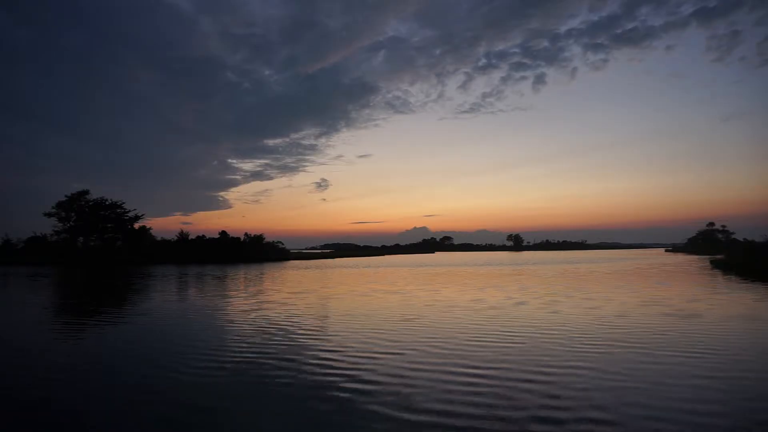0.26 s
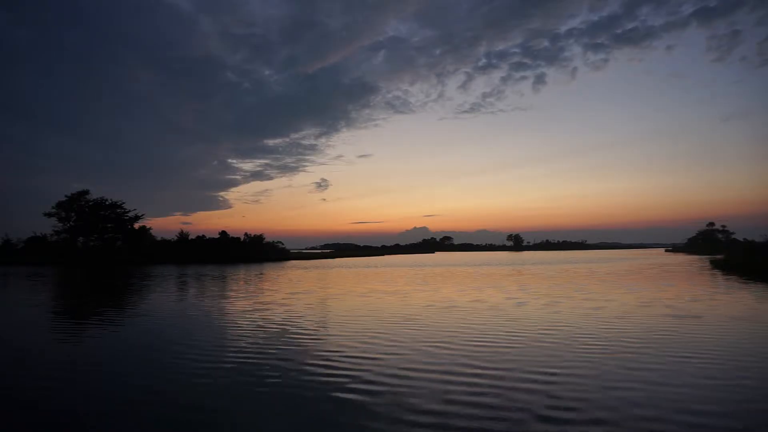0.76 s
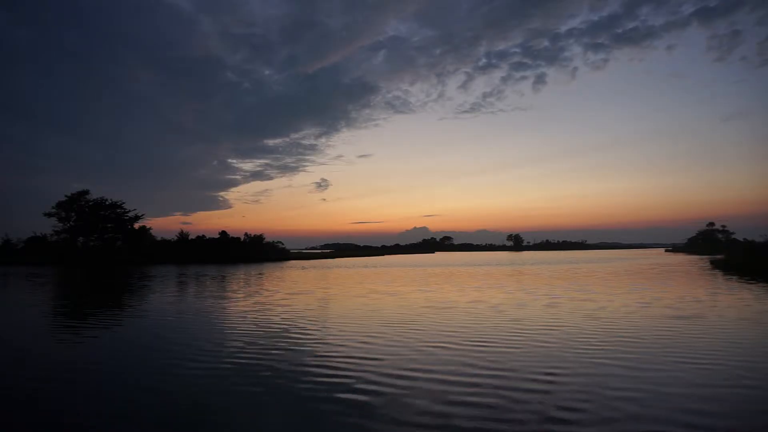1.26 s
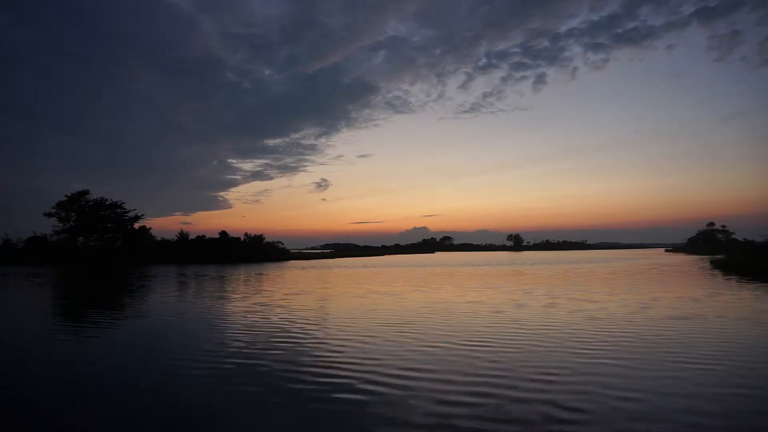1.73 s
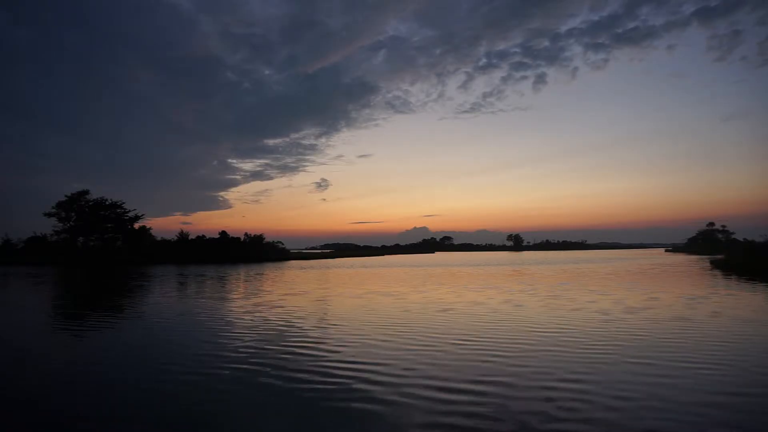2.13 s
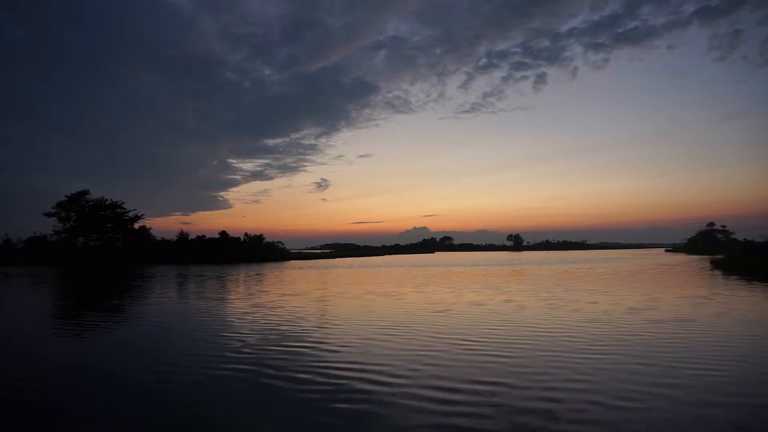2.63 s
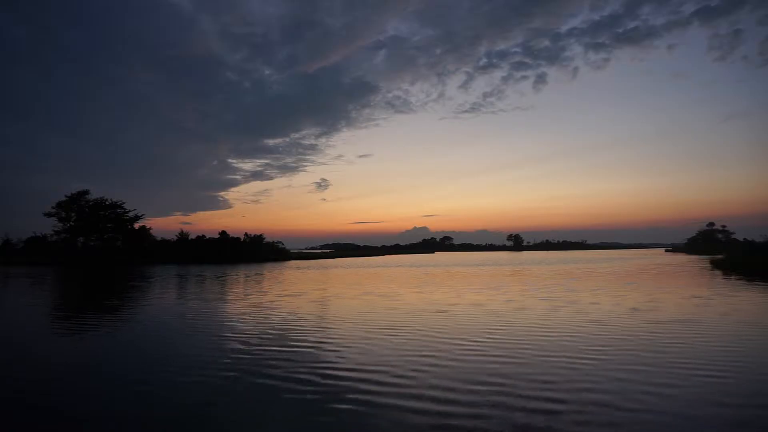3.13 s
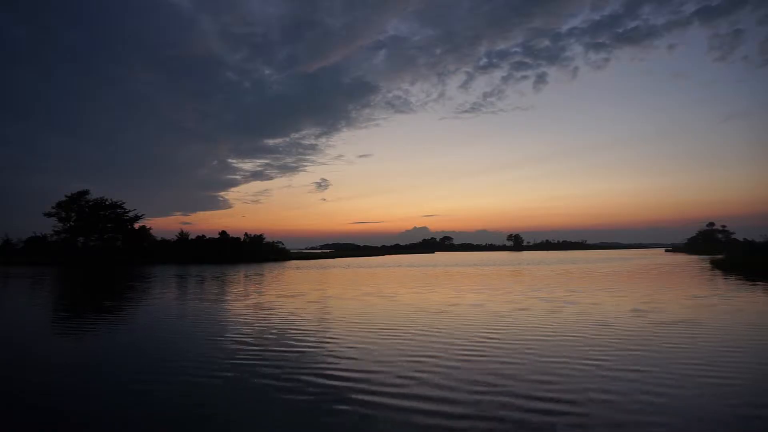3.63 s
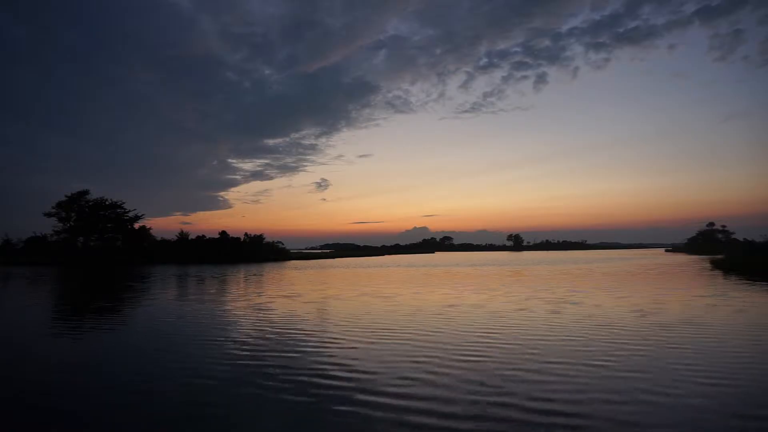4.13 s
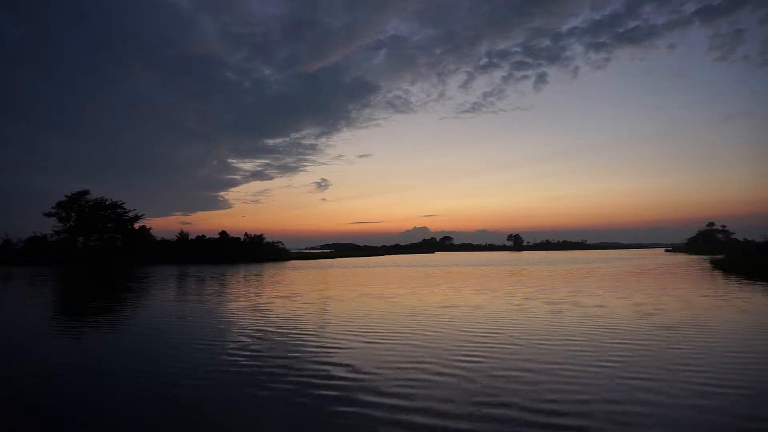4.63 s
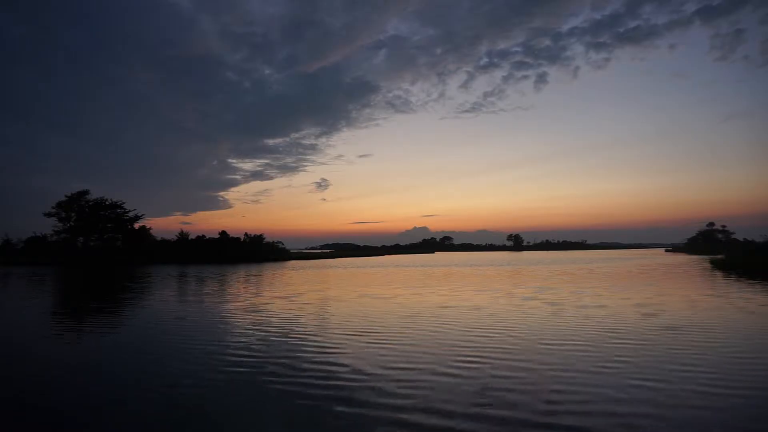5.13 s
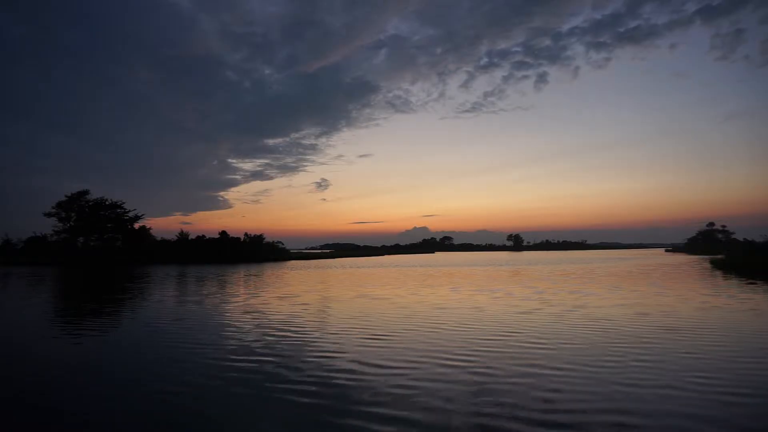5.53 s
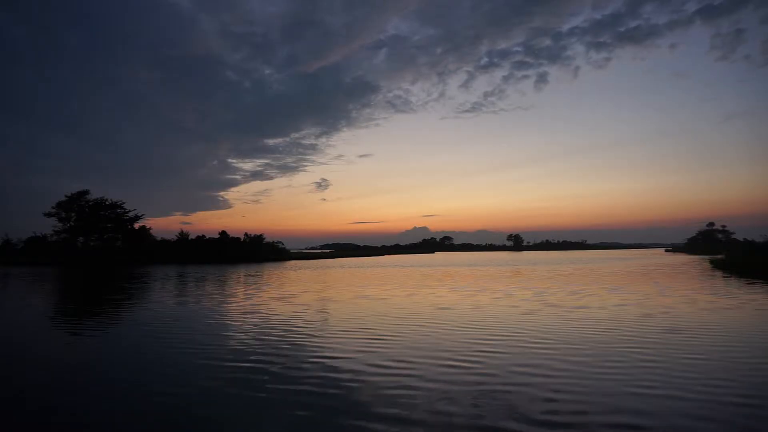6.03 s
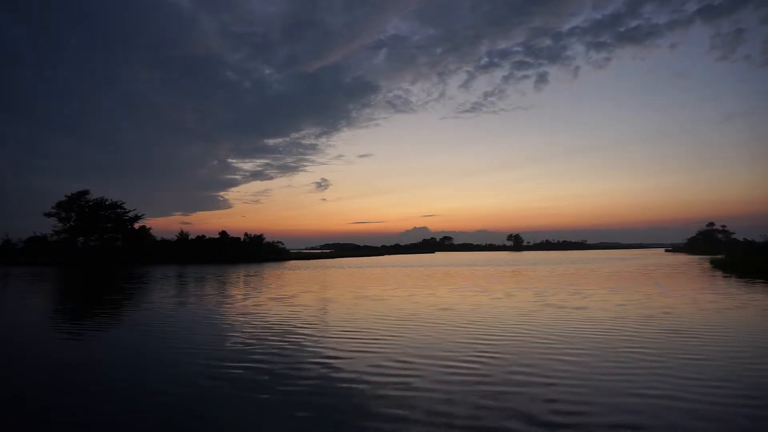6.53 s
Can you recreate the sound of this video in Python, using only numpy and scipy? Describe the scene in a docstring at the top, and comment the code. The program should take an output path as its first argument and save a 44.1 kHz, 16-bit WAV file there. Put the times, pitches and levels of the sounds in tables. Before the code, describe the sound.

Over a soft, steady hiss of air and water with faint high insect trills, small dry ticks close to the microphone gather into a dense rattle, strongest around two seconds, while a far bird gives rising chirps. It then thins to isolated clicks and soft wind bumps. Two sharp snaps stand out at about 3.4 and 6 seconds; grass rustles and water plips near the end. Open marsh shore, short faint echo.

```python
"""Dusk on a marsh shore. From the start: a hiss of air and water (filtered noise), two far insect trills (pulsed
resonances), runs of dry ticks from a handled camera mount (short tone packets and cracks) and falling double peeps.
Then dull knocks (crack and low ring), wind bumps on the microphone (low noise, short rings), a far bird's rising
chirps (gliding sines) and bright clicks (mostly crack). Two sharp snaps (slip, break, rebound) fall in the second half.
Late on, water plips (bubble rings), a near cricket trills briefly, grass rustles (dense grains), squeaks glide."""
import sys
import numpy as np
from scipy import signal
from scipy.fft import rfft, irfft, next_fast_len
from scipy.io import wavfile
from scipy.ndimage import uniform_filter1d

SR = 44100
rng = np.random.default_rng(int(sys.argv[2]) if len(sys.argv) > 2 else 0)


def master_out(mix):
    """Clip the mix to full scale and print it as 16-bit PCM to the path in sys.argv[1]."""
    frames = np.transpose(np.atleast_2d(mix))
    ceiling = np.clip(frames, -1, 1)
    pcm = np.round(ceiling * 32767).astype(np.int16)
    wavfile.write(sys.argv[1], SR, pcm)


N = 298557
TIME = np.arange(N) / SR
LEAD_S = .006  # silence ahead of each crack, room for an early slip


def gain_of(db):
    """Decibels to gain."""
    return 10 ** (np.asarray(db) / 20)


def evened(x):
    """Scales to rms 1."""
    return x / np.sqrt(np.mean(x ** 2) + 1e-20)


def read(points, hz):
    """Interpolates a spectrum on a log-frequency axis."""
    point_hz, value = np.transpose(points)
    return np.interp(np.log(hz + 1), np.log(point_hz + 1), value)


def level(curve):
    """Gain at every sample from rows (s, dB)."""
    return gain_of(np.interp(TIME, *np.transpose(curve)))


def swells(rows, attack_s, release_s):
    """Gain at every sample from rows (start s, length s, dB): each rises, holds and dies away."""
    power = np.zeros(N)
    for start_s, length_s, db in rows:
        before = np.maximum(start_s - TIME, 0) / attack_s
        after = np.maximum(TIME - start_s - length_s, 0) / release_s
        power += (gain_of(db) * np.exp(-np.minimum(before + after, 20))) ** 2
    return np.sqrt(power)


def add(mix, start_s, sound):
    """Mixes a sound in at a time."""
    part = mix[..., max(round(start_s * SR), 0):][..., :sound.shape[-1]]
    part += sound[..., :part.shape[-1]]


def coloured(x, points, tilt_db=0):
    """Filters by a spectrum, tilted in dB per octave about 3 kHz (flat below 700 Hz); rms 1."""
    hz = np.fft.rfftfreq(x.shape[-1], 1 / SR)
    octaves = np.log2(np.maximum(hz, 700) / 3000)
    gain = gain_of(read(points, hz) + tilt_db * octaves)
    return evened(irfft(rfft(x) * gain, x.shape[-1]))


def drift(hz):
    """Slow random curve of rms 1: noise under a Gaussian lowpass."""
    size = next_fast_len(N, True)
    lowpass = np.exp(-(np.fft.rfftfreq(size, 1 / SR) / hz) ** 2)
    return evened(irfft(rfft(rng.standard_normal(size)) * lowpass, size)[:N])


def noise_pair(size, same):
    """White noise at two ports, correlated by a share."""
    a, b = rng.standard_normal((2, size))
    same = np.clip(same, -1, 1)
    return np.array([a, same * a + np.sqrt(1 - same ** 2) * b])


def crack(colour, decay_s, tilt_db=0, direct_s=0.02):
    """A dying noise burst of tiny fractures after a short lead; its later part arrives from all sides."""
    t = np.arange(4096) / SR - LEAD_S
    fade = np.exp(-np.abs(t) / decay_s) * (t >= 0)
    noise = noise_pair(len(t), np.exp(-np.abs(t) / direct_s))
    return coloured(noise * fade, colour, tilt_db) * np.sqrt(np.mean(fade ** 2))


def ring(hz, decay_s):
    """A short resonance that swells for one decay time, then dies."""
    t = np.arange(0, 10 * decay_s, 1 / SR)
    return t / decay_s * np.exp(1 - t / decay_s) * np.sin(2 * np.pi * hz * t)


def glide(length_s, first_hz, last_hz):
    """A thin tone that slides up or down in a straight line."""
    hz = np.linspace(first_hz, last_hz, round(length_s * SR))
    return signal.windows.tukey(len(hz), .7) * np.sin(2 * np.pi * np.cumsum(hz) / SR)


# Slow level of the open air. Each row: time in seconds, level in dB.
AIR_LEVEL_DB = [(0, -64), (1.2, -63.5), (2.3, -62), (3, -64.5), (3.9, -61), (4.8, -63), (6.77, -63.5)]
# Spectrum of the air. Each row: frequency in Hz, relative density in dB.
AIR_SPECTRUM_DB = [(15, -70), (25, -39), (94, -23.5), (311, -4), (381, -6), (433, -2.5), (573, -2),
                   (1000, -0.5), (1330, -2), (2450, -6), (3500, -6), (3970, -6.5), (6960, -10), (8750, -8),
                   (11000, -12), (14300, -113), (22000, -120)]
# Correlation of the air at the two ports. Each row: frequency in Hz, share (clipped to 1).
AIR_CORRELATION = [(130, 1.5), (270, 0.87), (570, 0.1), (1200, 0), (11000, 0.06)]
# Balance of the air. Each row: frequency in Hz, left minus right in dB.
AIR_BALANCE_DB = [(110, -2.5), (350, -3), (620, -6), (1120, 0.5), (2000, 0.5), (3600, 0), (11000, 0)]


def air(patch_db=1.0):
    """Far water and air: a soft hiss with drifting patches, alike at both ports only in the bass."""
    frames, hz = N // 256 + 5, np.fft.rfftfreq(1024, 1 / SR)
    a, b, c, d, patches = rng.standard_normal((frames, 513, 5)).T
    patches = uniform_filter1d(patches, size=12, axis=0)
    patches = evened(uniform_filter1d(patches, size=16, axis=1))
    same = np.clip(read(AIR_CORRELATION, hz), -1, 1)[:, None]
    side = gain_of(read(AIR_BALANCE_DB, hz) / 2)[:, None]
    left = a + 1j * b
    right = same * left + np.sqrt(1 - same ** 2) * (c + 1j * d)
    bins = np.array([left * side, right / side])
    bins *= gain_of(read(AIR_SPECTRUM_DB, hz)[:, None] + patch_db * patches)
    hiss = signal.istft(bins, nperseg=1024, noverlap=768)[1][:, :N]
    return level(AIR_LEVEL_DB) * evened(hiss)


def trill(curve, hz, width_hz, strokes_hz, depth, direct=0):
    """Wing strokes pulse a resonance that distance has smeared; a near insect keeps a direct tone."""
    smear = direct + drift(width_hz) + 1j * drift(width_hz)
    carrier = np.exp(2j * np.pi * hz * TIME) * smear
    strokes = np.cumsum(strokes_hz * (1 + 0.0199 * drift(3.3))) / SR
    pulses = np.exp(depth * np.cos(2 * np.pi * strokes))
    ports = np.array([carrier.real, (carrier * np.exp(-.8j)).real])  # right lags 0.8 rad
    return level(curve) * evened(pulses * ports)


# Level of a high katydid. Each row: time in seconds, level in dB.
KATYDID_LEVEL_DB = [(0, -80.5), (.5, -74.5), (1.5, -73), (2.7, -75), (4, -73), (4.7, -79.5), (6.77, -92)]


def katydid():
    """High trill: wing strokes pulse a smeared resonance."""
    return trill(KATYDID_LEVEL_DB, hz=8660, width_hz=240, strokes_hz=55.4, depth=0.39)


# Level of a far insect chorus. Each row: time in seconds, level in dB.
CHORUS_LEVEL_DB = [(0, -72.5), (.5, -69.5), (1, -74.5), (2.8, -73.5), (3.2, -90), (6.77, -78)]


def chorus():
    """Far insects: a wide resonance, only shallowly pulsed."""
    return trill(CHORUS_LEVEL_DB, hz=4200, width_hz=330, strokes_hz=51.0, depth=0.11)


# Spectrum of a tick's scatter. Each row: frequency in Hz, relative level in dB.
TICK_SPECTRUM_DB = [(20, -60), (150, -41), (600, -15.5), (1250, -1.5), (1700, -9), (2400, 6.5), (3100, 2.5),
                    (4500, 6.5), (5600, -7), (8500, -8.5), (11000, -21)]


def tick(hz, half_s=0.00059, slip_db=-15, rebound_db=-6, rattle_db=-10, scatter_db=-14):
    """A soft slip, a main packet of a few cycles, two uneven rebounds and a scattered tail."""
    out = gain_of(scatter_db) * crack(TICK_SPECTRUM_DB, decay_s=0.0093)
    t = np.arange(len(out[0])) / SR - LEAD_S - .0007  # main packet peaks 0.7 ms after the crack starts
    slip_s, rebound_s = -rng.uniform(0.00117, 0.0069), rng.uniform(0.001286, 0.00254)
    delays_s = [0, slip_s, rebound_s, rng.uniform(0.00297, 0.0035)]
    pitches_hz = hz * np.append(1, rng.uniform(0.87, 1.2, 3))
    for delay_s, pitch_hz, db in zip(delays_s, pitches_hz, [0, slip_db, rebound_db, rattle_db]):
        envelope = 1 / np.cosh(np.clip((t - delay_s) / half_s, -20, 20))
        out += gain_of(db) * np.cos(2 * np.pi * pitch_hz * (t - delay_s)) * envelope
    return out


# The clearest dry ticks. Each row: start in seconds, level in dB.
CLEAR_TICKS = [(0.035, -46), (0.07, -47.5), (0.408, -44), (0.66, -44.5), (0.674, -44), (0.713, -50),
               (0.7552, -41), (0.768, -43.5), (0.8266, -39), (0.86, -40.5), (0.905, -47.5), (0.913, -41),
               (1.1537, -40), (1.1757, -36.5), (1.1938, -30), (1.235, -35), (1.258, -34), (1.3069, -31),
               (1.3321, -29.5), (1.354, -28.5), (1.3821, -38.5), (1.6053, -42.5), (1.694, -38.5),
               (1.7116, -39.5), (1.7502, -37), (1.76, -37.5), (1.7679, -34), (1.7926, -35), (1.8162, -23),
               (1.849, -25.5), (1.87, -23.5), (1.904, -33.5), (1.932, -31.5), (1.9746, -36), (1.990, -25),
               (2.0113, -29), (2.025, -27.5), (2.0378, -25), (2.054, -31.5), (2.0724, -29.5),
               (2.1048, -38.5), (2.1492, -39.5), (2.277, -44), (2.2984, -43.5), (2.4244, -33.5),
               (2.4421, -27.5), (2.474, -43), (2.4932, -33), (2.7824, -42), (2.876, -48.5)]
# Runs of faint slips as the mount creeps. Each row: start in seconds, length in seconds, level in dB.
CREEP_RUNS = [(.02, 0.1, -48), (.24, 0.18, -52.5), (.7, .22, -44.5), (1.11, 0.29, -45.5),
              (1.46, 0.22, -49.5), (1.69, 0.49, -46), (2.22, .11, -45), (2.42, 0.099, -48),
              (2.54, 0.21, -57)]
# Spectrum of a slip's scratch. Each row: frequency in Hz, relative level in dB.
SCRATCH_SPECTRUM_DB = [(20, -85), (1200, -6), (1900, -18), (2500, 3.5), (3100, 3.5), (4300, -3),
                       (5500, -22), (11000, -14.5)]
TICK_HZ, TICK_SCATTER = 3080, .035  # shared pitch; share by which it varies
SLIPS_PER_S = 60


def ticks(spread_db=3, rub_db=-8, small_db=-4, small_spread_db=5):
    """Clear ticks; between them the mount creeps in uneven slips, each a scratch and often a small tick."""
    out = np.zeros((2, N))
    for (s, db), detune in zip(CLEAR_TICKS, 2 * rng.random(len(CLEAR_TICKS)) - 1):
        add(out, s - LEAD_S, gain_of(db) * tick(TICK_HZ * (1 + TICK_SCATTER * detune)))
    creep = swells(CREEP_RUNS, attack_s=0.017, release_s=0.049)
    starts_s = np.arange(0, 3, 1 / SLIPS_PER_S)
    for s, (late, size, tilt, catch, detune) in zip(starts_s, 2 * rng.random((len(starts_s), 5)) - 1):
        s += abs(late) / SLIPS_PER_S
        scratch = crack(SCRATCH_SPECTRUM_DB, decay_s=0.0059, tilt_db=1.3 * tilt)
        slip = gain_of(rub_db + spread_db * size) * scratch
        if catch > 0:
            small = tick(TICK_HZ * (1 + TICK_SCATTER * detune))
            slip += gain_of(small_db + small_spread_db * size) * small
        add(out, s - LEAD_S, creep[round(s * SR)] * slip)
    return out


# Right port's phase lag for near sounds. Each row: frequency in Hz, lag in radians.
PORT_LAG_RAD = [(0, 0.32), (2800, 0.13), (4200, 0.83), (6300, 1.28), (7300, 2.07), (11000, 2.18)]
# Right port's gain for near sounds. Each row: frequency in Hz, gain in dB.
PORT_GAIN_DB = [(300, -5.5), (1200, -1.5), (2500, -5), (4000, 0), (6000, -0.3), (11000, -1.5)]


def near_ports(x):
    """Near sounds sit a little to the left: the right port lags and is shaded by frequency."""
    left, right = x
    hz = np.fft.rfftfreq(N, 1 / SR)
    path = np.exp(-1j * read(PORT_LAG_RAD, hz)) * gain_of(read(PORT_GAIN_DB, hz))
    return np.array([left * gain_of(-0.54), irfft(rfft(right) * path, N)])


# The mount's modes. Each row: frequency in Hz, level in dB before division by t60, t60 in seconds.
MOUNT_MODES = [(1720, 5, 0.19), (2075, 9, 0.29), (2180, 8, 0.1), (2470, 0.5, 0.079), (2583, 1, 0.36),
               (3260, -15, 0.057), (4180, -10, 0.046), (4520, 2, 0.053), (4670, -1, 0.069)]


def mount(x, ring_db=-28):
    """Each near impact leaves the mount ringing faintly in decaying modes."""
    t = np.arange(SR // 3) / SR
    modes = np.zeros(len(t))
    for hz, db, t60_s in MOUNT_MODES:
        modes += gain_of(db - 60 * t / t60_s) * np.sin(2 * np.pi * hz * t) / t60_s
    return gain_of(ring_db) * signal.fftconvolve(x, modes[None] / np.linalg.norm(modes), axes=1)[:, :N]


# Spectrum of the shore's echo. Each row: frequency in Hz, relative level in dB.
SHORE_SPECTRUM_DB = [(100, -28), (700, -16), (1400, 1.5), (2100, -7), (2500, -14.5), (2900, -9),
                     (3800, -12), (6000, -15), (11000, -19)]


def shore(x, t60_s):
    """Diffuse echo from reeds and water: convolution with a decaying noise tail."""
    t = np.arange(SR // 2) / SR
    tail = coloured(rng.standard_normal((2, len(t))), SHORE_SPECTRUM_DB)
    tail = tail * gain_of(-60 * t / t60_s) * np.minimum(t / 0.0014, 1)
    return signal.fftconvolve(x, tail / np.linalg.norm(tail[0]), axes=1)[:, :N]


# Far double peeps. Each row: start in seconds, level in dB.
PEEP_PAIRS = [(.12, -68), (.735, -66.5), (3.58, -68.5), (4.024, -68)]
PEEP_S, PEEP_SPACING_S, PEEP_FIRST_HZ, PEEP_LAST_HZ = 0.03, .051, 4820, 4630


def peeps():
    """Pairs of short falling tones, far off."""
    out = np.zeros((2, N))
    for s, db in PEEP_PAIRS:
        for start_s in (s, s + PEEP_SPACING_S):
            add(out, start_s, gain_of(db) * glide(PEEP_S, PEEP_FIRST_HZ, PEEP_LAST_HZ))
    return out


# Spectrum of a strike's crack. Each row: frequency in Hz, relative level in dB.
CRACK_SPECTRUM_DB = [(20, -66), (100, -37), (300, -26.5), (800, -11.5), (1400, -9.5), (2000, -5.5),
                     (2600, 1.5), (3600, -3.5), (4800, -8.5), (6100, -12.5), (7000, -11), (9000, -14),
                     (11000, -17.5)]


def strike(tilt_db, decay_s, hz, ring_db, ring_decay_s):
    """A broad crack and one short ring."""
    out = crack(CRACK_SPECTRUM_DB, decay_s, tilt_db)
    add(out, LEAD_S, gain_of(ring_db) * ring(hz, ring_decay_s))
    return out


# Dull knocks. Each row: start in seconds, crack level in dB, tilt in dB per octave, ring in dB above the crack.
DULL_KNOCKS = [(0.529, -48, -8.5, 0.5), (0.6841, -49, -12, 1.5), (0.813, -48, -8, 1.5),
               (1.279, -46.5, -10, 3.5), (2.3502, -38.5, 0, -3), (4.653, -36.5, -2, -5.5)]
KNOCK_HZ, KNOCK_RING_S, KNOCK_DECAY_S = 1178, 0.0022, 0.0086


def knocks():
    """Dull knocks: a crack with a low, brief ring."""
    out = np.zeros((2, N))
    for s, db, tilt_db, ring_db in DULL_KNOCKS:
        knock = strike(tilt_db, KNOCK_DECAY_S, KNOCK_HZ, ring_db, KNOCK_RING_S)
        add(out, s - LEAD_S, gain_of(db) * knock)
    return out


# Gusts on the microphone. Each row: start in seconds, length in seconds, level in dB before lumps.
WIND_GUSTS = [(.92, 0.13, -79.5), (1.17, 0.048, -77), (1.32, 0.036, -65), (2.4, 0.065, -65),
              (2.55, 0.15, -65), (2.9, 0.23, -66), (3.33, 0.076, -62.5), (5.5, 0.036, -84),
              (6.37, 0.044, -79.5)]
# Single soft bumps on the microphone. Each row: start in seconds, level in dB, pitch in Hz.
WIND_BUMPS = [(.930, -65, 213), (1.045, -59.5, 263), (2.574, -51.5, 129), (2.823, -57.5, 196),
              (2.900, -51, 149), (2.960, -56, 142), (3.346, -52.5, 182), (5.52, -61.5, 260)]
# Spectrum of the wind. Each row: frequency in Hz, relative level in dB.
WIND_SPECTRUM_DB = [(10, -55), (30, -37), (50, -7), (80, -4.5), (140, 1.5), (220, -5.5), (330, -13.5),
                    (700, -14.5), (2000, -64)]


def wind(lumpy_db=2.0, calm_db=-97):
    """Lumpy low noise in gusts, with a few soft bumps as short low rings."""
    force = gain_of(calm_db) + swells(WIND_GUSTS, attack_s=.035, release_s=0.067)
    rumble = coloured(noise_pair(N, same=0.54), WIND_SPECTRUM_DB)
    out = rumble * force * gain_of(lumpy_db * drift(27))
    for s, db, hz in WIND_BUMPS:
        add(out, s, gain_of(db) * ring(hz, .004))
    return out


# Far bird, one rising slur a row. Each row: top in seconds, length in seconds, top pitch in Hz,
# rise time in seconds, level at the top in dB before flutter.
BIRD_CHIRPS = [(1.540, 0.12, 5330, 0.062, -56.5), (1.658, 0.095, 4950, 0.044, -54),
               (1.762, .14, 5410, 0.057, -53.5), (1.915, .16, 5100, 0.063, -53),
               (2.014, 0.13, 5230, .06, -51.5), (2.185, .13, 4910, 0.067, -52.5),
               (2.492, .15, 4950, 0.067, -48.5), (2.793, 0.15, 4880, 0.053, -54),
               (5.205, .14, 4970, 0.048, -62), (5.48, 0.14, 4830, .05, -66),
               (5.772, .1, 4930, 0.066, -63.5), (6.335, .14, 4920, .058, -67.5),
               (6.728, 0.17, 4875, .058, -64)]
CHIRP_START = .735  # share of the top pitch at which a slur begins


def bird(lead_db=-10, onset_s=0.028, stop_s=0.0089, waver=0.007, flutter_db=2.0):
    """Each chirp starts soft and level, swells as it slurs upward and stops at the top."""
    out = np.zeros((2, N))
    wobble = 1 + waver * drift(60)
    for s, length_s, top_hz, rise_s, db in BIRD_CHIRPS:
        t = np.arange(-length_s, 2 * stop_s, 1 / SR)
        lift = np.exp(-(t / rise_s) ** 2)
        hz = top_hz * (CHIRP_START + (1 - CHIRP_START) * lift)
        hz = hz * np.interp(s + t, TIME, wobble)
        gate = np.minimum((t - t[0]) / onset_s, 1) / (1 + np.exp(2 * (t / stop_s + 1)))
        tone = np.sin(2 * np.pi * np.cumsum(hz) / SR)
        add(out, s + t[0], gate * gain_of(db + lead_db * (1 - lift)) * tone)
    return out * gain_of(flutter_db * drift(40))  # the air makes far calls flutter


# Bright clicks. Each row: start in seconds, level in dB, tilt in dB per octave, decay in seconds.
BRIGHT_CLICKS = [(2.44, -48, -3, 0.024), (2.472, -41.5, -2, .007), (2.4916, -42.5, -2.5, 0.011),
                 (3.8667, -40.5, 0, 0.0068), (4.159, -45, -7, 0.0019), (4.1644, -42, 5, 0.0049),
                 (4.1749, -45.5, -4, 0.0075), (4.298, -53, -9, .0037), (4.632, -53.5, 1.5, 0.012),
                 (5.3963, -54, 5, 0.0069), (5.545, -53.5, -10, 0.023), (6.3989, -42, -0.5, 0.016),
                 (6.4147, -37, -2, 0.0031), (6.467, -49, -2, .0077), (6.486, -47, -2, 0.027),
                 (6.505, -41.5, -2.5, 0.0065), (6.658, -46.5, -2.5, 0.01)]
CLICK_HZ, CLICK_RING_DB, CLICK_RING_S = 2560, -19, 0.0023


def clicks():
    """Bright clicks: nearly all crack, with a faint ring."""
    out = np.zeros((2, N))
    for s, db, tilt_db, decay_s in BRIGHT_CLICKS:
        click = strike(tilt_db, decay_s, CLICK_HZ, CLICK_RING_DB, CLICK_RING_S)
        add(out, s - LEAD_S, gain_of(db) * click)
    return out


# Loud snaps. Each row: break in seconds, level in dB, tilt in dB per octave, ring in Hz, ring in dB above the
# crack, ring decay in seconds, slip lead in seconds, slip in dB below the break, slip ring in Hz,
# slip ring in dB below the break, mount ring in dB.
LOUD_SNAPS = [(3.4186, -23, 0.5, 5980, 7, 0.00055, .0046, 7, 2830, -5.5, -24),
              (6.01, -18, 1.5, 3530, 2, 0.00037, 0.0026, 5.5, 940, 16.5, -35)]
BREAK_S, SLIP_S, SLIP_RING_S = 0.0027, 0.0049, 0.00093  # decays
REBOUND_LATE_S, REBOUND_S, REBOUND_HZ = .0019, 0.0055, 2520  # delay, decay, ring
REBOUND_DB, REBOUND_RING_DB = -3.5, -1.5  # crack and ring, each relative to the break's own


def snaps(fizz_db=-19, fizz_tilt_db=5):
    """A joint slips, breaks free milliseconds later and rebounds, leaving a bright fizz and jolting the mount."""
    out = np.zeros((2, N))
    for s, db, tilt_db, hz, ring_db, ring_s, early_s, softer_db, slip_hz, ring_softer_db, mount_db in LOUD_SNAPS:
        slip = strike(tilt_db, SLIP_S, slip_hz, softer_db - ring_softer_db, SLIP_RING_S)
        rebound_ring_db = ring_db + REBOUND_RING_DB - REBOUND_DB
        rebound = strike(tilt_db, REBOUND_S, REBOUND_HZ, rebound_ring_db, ring_s)
        snap = strike(tilt_db, BREAK_S, hz, ring_db, ring_s)
        fizz = crack(CRACK_SPECTRUM_DB, decay_s=0.021, tilt_db=tilt_db + fizz_tilt_db)
        snap += gain_of(fizz_db) * fizz
        add(snap, REBOUND_LATE_S, gain_of(REBOUND_DB) * rebound)
        add(out, s - LEAD_S - early_s, gain_of(db - softer_db) * slip)
        add(out, s - LEAD_S, gain_of(db) * snap)
        add(out, s - LEAD_S, gain_of(db) * mount(snap, mount_db))
    return out


# Level of a near cricket. Each row: time in seconds, level in dB.
CRICKET_LEVEL_DB = [(4.7, -110), (4.9, -72.5), (5.82, -69), (5.87, -110)]


def cricket():
    """Near trill: deeply pulsed, with a direct tone in its resonance."""
    return trill(CRICKET_LEVEL_DB, hz=4100, width_hz=120, strokes_hz=49.2, depth=.9, direct=1.3)


# The clearest plips of water. Each row: start in seconds, level in dB, pitch in Hz.
CLEAR_PLIPS = [(4.842, -57, 980), (5.397, -50, 965), (5.476, -62, 1380), (5.505, -56.5, 390),
               (5.509, -59, 1020), (5.635, -50, 1350), (5.741, -53.5, 1250), (5.843, -55, 2340),
               (5.884, -59, 1370), (6.684, -54.5, 1440), (6.7504, -52, 2470)]
# Level of the grass rustle, which the small bubbles follow. Each row: time in seconds, level in dB.
RUSTLE_LEVEL_DB = [(5.15, -81), (5.3, -61), (5.4, -61.5), (5.53, -58.5), (5.64, -64), (6.1, -63),
                   (6.25, -69.5), (6.5, -62), (6.77, -61.5)]
BUBBLES_PER_S, BUBBLE_LOW_HZ, BUBBLE_HIGH_HZ = 55, 1100, 3010


def plips(decay_s=0.0021, half_side_db=2, small_db=-3, spread_db=8):
    """Bubbles ring for a few cycles, a little to the right; small random ones follow the grass's level."""
    out, stir = np.zeros(N), level(RUSTLE_LEVEL_DB)
    for s, db, hz in CLEAR_PLIPS:
        add(out, s, gain_of(db) * ring(hz, decay_s))
    starts_s = np.arange(0, TIME[-1], 1 / BUBBLES_PER_S)
    for s, (late, size, pitch) in zip(starts_s, rng.random((len(starts_s), 3))):
        s += late / BUBBLES_PER_S
        hz = BUBBLE_LOW_HZ * (BUBBLE_HIGH_HZ / BUBBLE_LOW_HZ) ** pitch
        gain = stir[min(round(s * SR), N - 1)] * gain_of(small_db + spread_db * size)
        add(out, s, gain * ring(hz, decay_s))
    return np.array([out / gain_of(half_side_db), out * gain_of(half_side_db)])


# Spectrum of the rustle. Each row: frequency in Hz, relative level in dB.
RUSTLE_SPECTRUM_DB = [(20, -59), (120, -19.5), (400, -9.5), (900, -5.5), (1300, 1.5), (1800, -9), (2500, 3),
                      (3400, -14), (6000, -15), (11000, -29)]


def rustle(grains_per_s=500, spread_db=-1.5, clump_db=2, half_side_db=1.1):
    """Many tiny stem contacts of uneven size, in clumps: random grains smeared into noise bursts."""
    sizes = gain_of(spread_db * np.minimum(rng.exponential(1, N), 4))
    grains = (rng.random(N) < grains_per_s / SR) * sizes
    smear = signal.lfilter([1], [1, -np.exp(-1 / (0.006 * SR))], grains)  # 6 ms decay
    smear = smear * gain_of(clump_db * drift(30))
    noise = coloured(noise_pair(N, same=0.26) * smear, RUSTLE_SPECTRUM_DB)
    return level(RUSTLE_LEVEL_DB) * noise * gain_of([[-half_side_db], [half_side_db]])


# Thin squeaks. Each row: start in seconds, length in seconds, first pitch in Hz, last pitch in Hz, level in dB.
SQUEAKS = [(5.29, .12, 3950, 3490, -68), (6.483, 0.021, 640, 1080, -53.5), (6.516, 0.053, 493, 688, -62),
           (6.533, 0.0365, 2430, 3000, -52.5), (6.557, 0.037, 2490, 3070, -53.5)]


def squeaks():
    """Single thin tones, each a straight glide."""
    out = np.zeros((2, N))
    for s, length_s, first_hz, last_hz, db in SQUEAKS:
        add(out, s, gain_of(db) * glide(length_s, first_hz, last_hz))
    return out


def scene():
    """Near impacts with mount ring and echo, the echoing bird, and the sounds of the marsh."""
    near = near_ports(ticks() + knocks() + clicks() + snaps())
    near = near + mount(near) + gain_of(-15.5) * shore(near, t60_s=0.12)
    calls = bird()
    calls += gain_of(-5) * shore(calls, t60_s=.3)
    insects = katydid() + chorus() + cricket()
    water_and_grass = plips() + rustle()
    return air() + insects + near + peeps() + wind() + calls + water_and_grass + squeaks()


def record(dry):
    """The recorder's 55 Hz low cut and 11.25 kHz band limit."""
    low_cut = signal.butter(2, 55, "highpass", fs=SR, output="sos")
    band_limit = signal.firwin(301, 11250, window=("kaiser", 8), fs=SR)
    return signal.oaconvolve(signal.sosfilt(low_cut, dry), band_limit[None], "same")


dry = scene()
out = record(dry)
master_out(out)
```